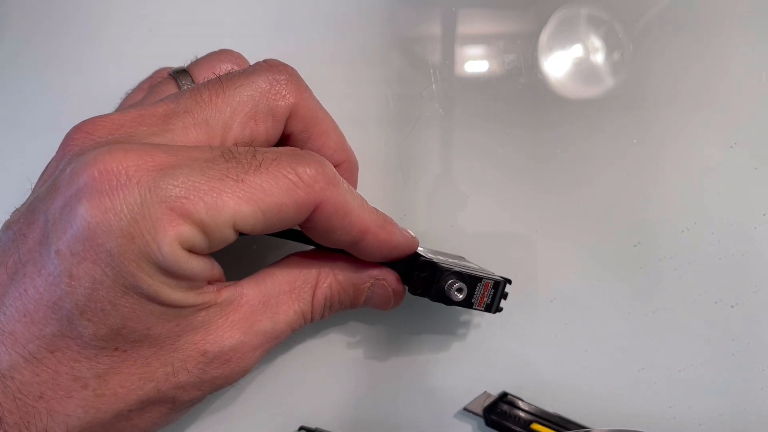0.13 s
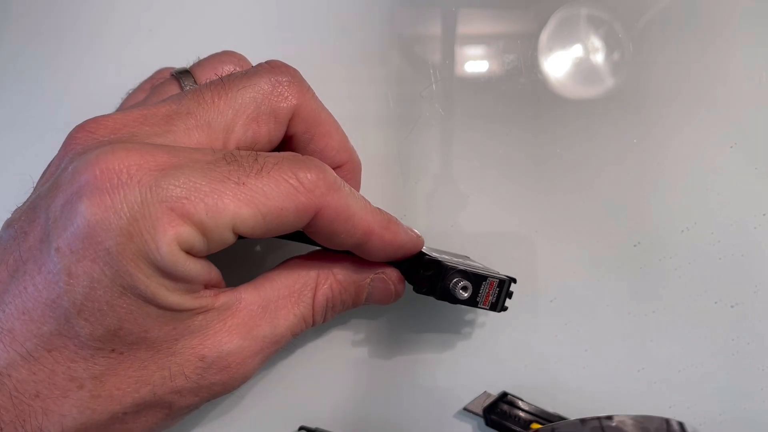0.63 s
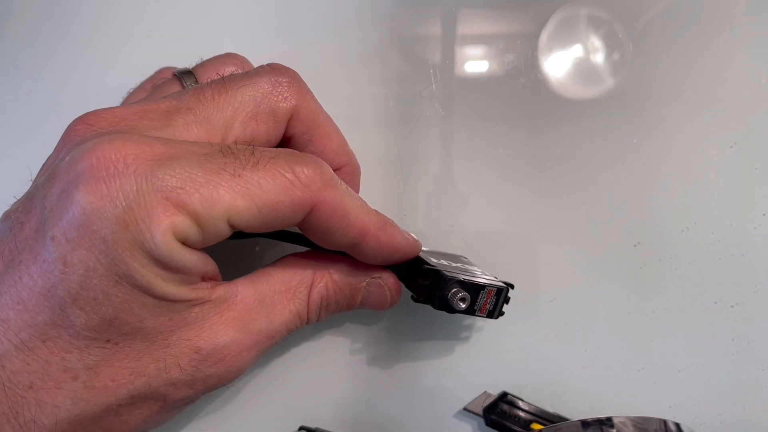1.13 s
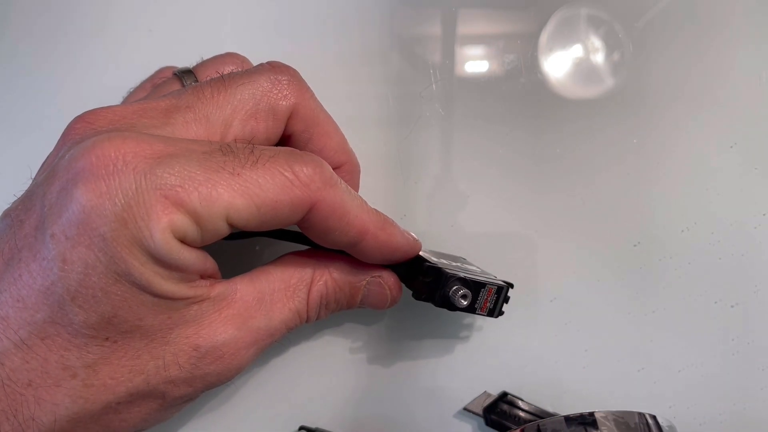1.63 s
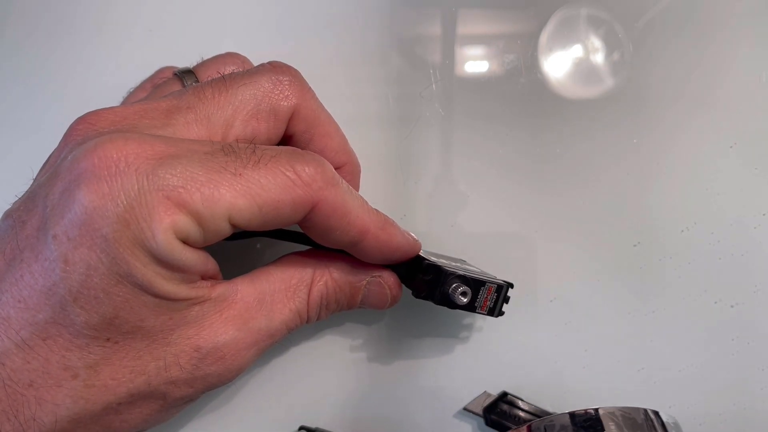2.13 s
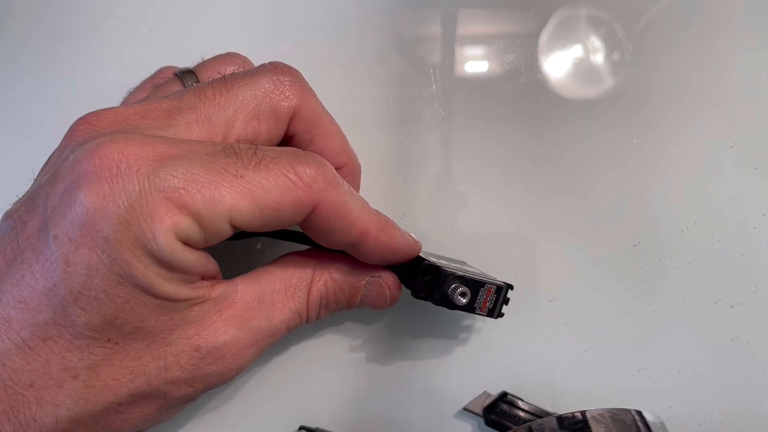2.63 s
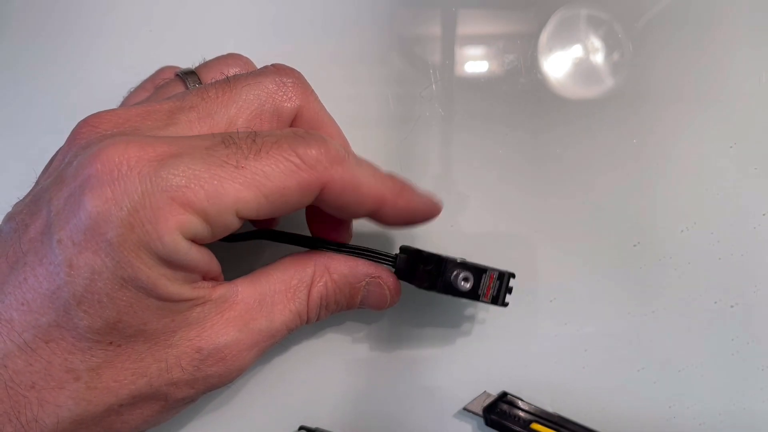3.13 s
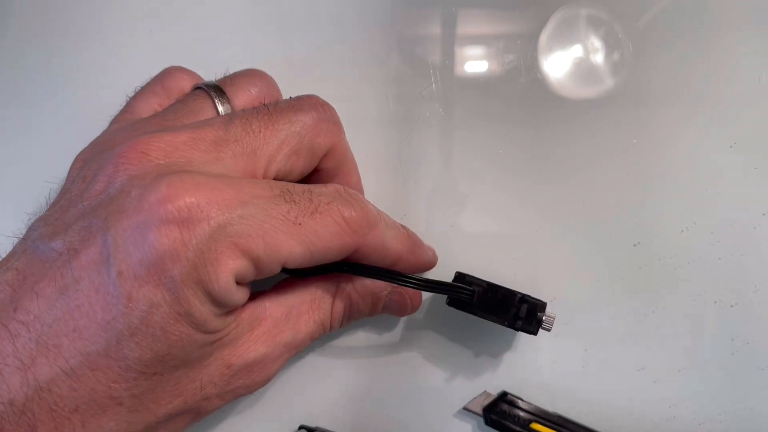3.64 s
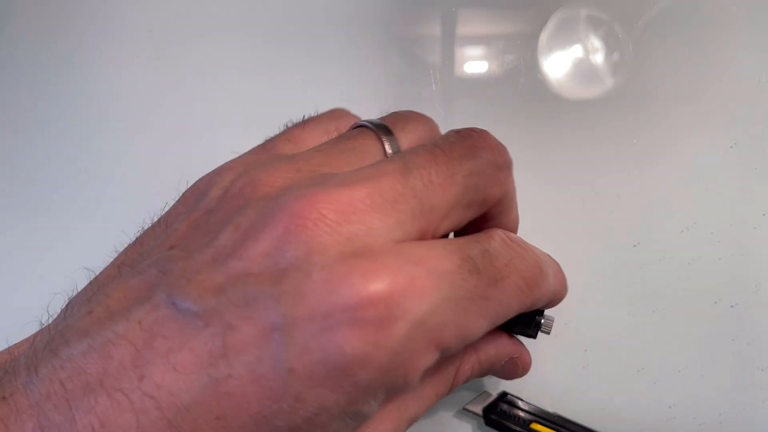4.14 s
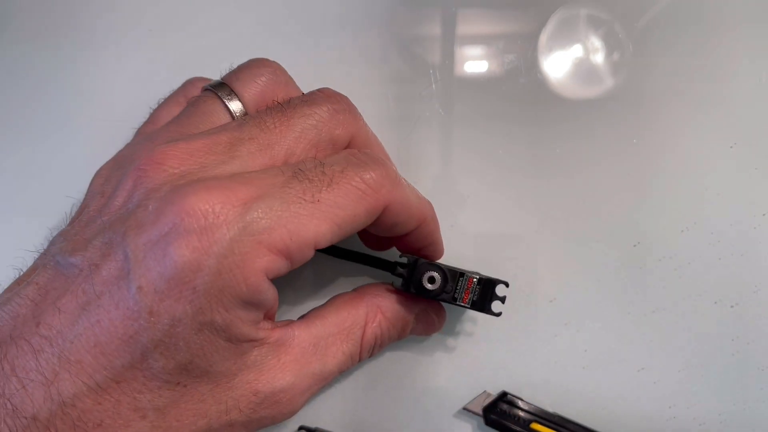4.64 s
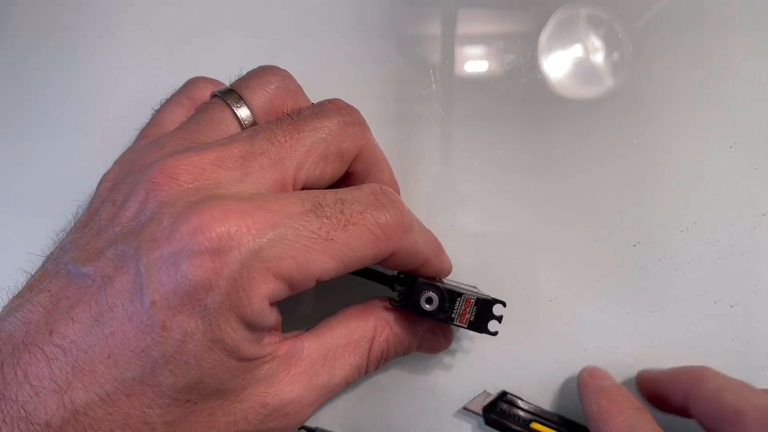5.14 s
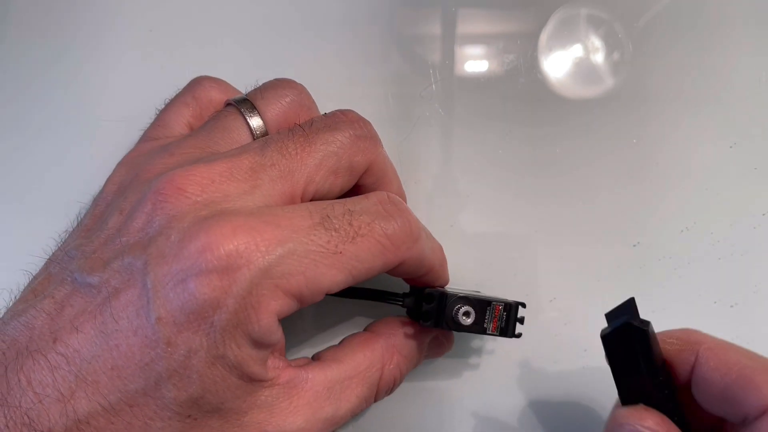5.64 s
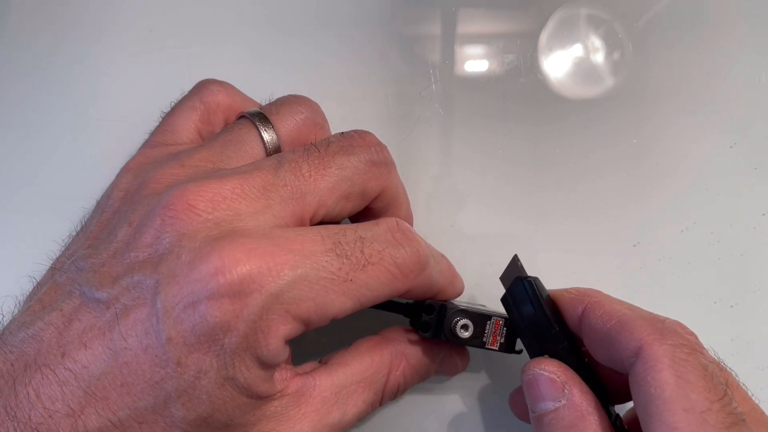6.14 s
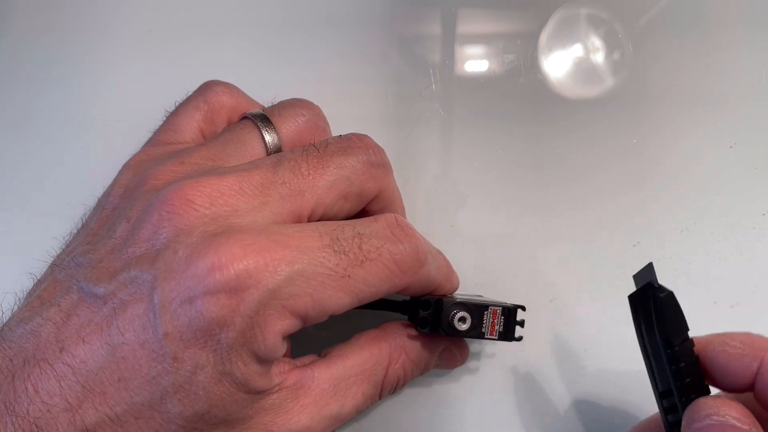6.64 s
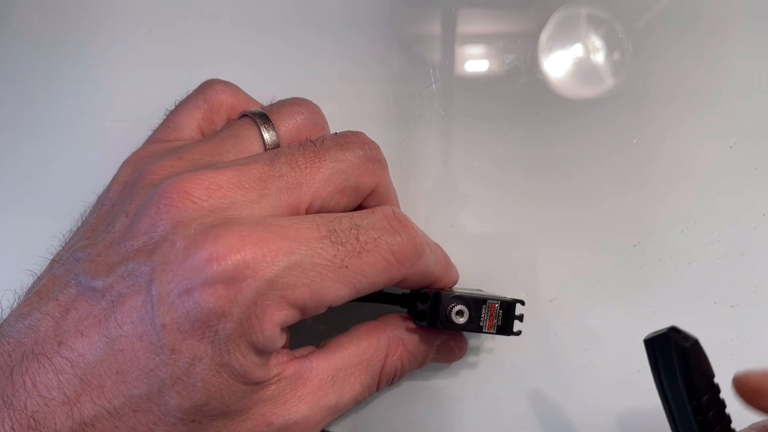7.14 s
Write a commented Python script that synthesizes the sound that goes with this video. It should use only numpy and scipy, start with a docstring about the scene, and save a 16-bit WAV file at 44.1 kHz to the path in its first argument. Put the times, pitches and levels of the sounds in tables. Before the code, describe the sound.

Loud steady hairdryer roar with a high motor whine, switched off into a falling glide, followed by bench thuds, light handling and sharp clicks.

```python
"""A hairdryer blows close by, then is switched off and coasts down with a falling whine and a fading rush of air.
It is laid on a glass-topped bench, and hands shift small parts and a plastic knife: knocks, clicks, thuds, rubbing.
The motor is a set of sines on multiples of the shaft speed; the air, casing buzz and rubbing are shaped noise.
Contacts and thuds are short pushes into damped modes; a noise tail gives the contacts their room.
Two close microphone ports pick it all up."""
import sys
import numpy as np
from scipy import signal
from scipy.fft import rfft, irfft, next_fast_len
from scipy.io import wavfile
from scipy.ndimage import uniform_filter1d

SR = 44100
rng = np.random.default_rng(int(sys.argv[2]) if len(sys.argv) > 2 else 0)


def wav_record(signal):
    """Record a signal, one row per channel, as 16-bit PCM in the file named by sys.argv[1]."""
    frames = np.transpose(np.atleast_2d(signal))
    bounded = np.clip(frames, -1, 1)
    # unit amplitude maps onto the largest positive 16-bit level
    quanta = np.round(bounded * 32767).astype(np.int16)
    wavfile.write(sys.argv[1], SR, quanta)


def undo_db(level):
    """Turn decibels back into plain size, where 20 dB means ten times bigger."""
    steps = np.asarray(level, float) / 20
    return 10 ** steps


N = 320607
SIZE = next_fast_len(N + SR)  # transform length, with room for the reverberant tail
HZ = np.maximum(np.arange(SIZE // 2 + 1) * SR / SIZE, 1)
SWITCH_S = 2.709  # the dryer is switched off

# Soft blows to the bench. Each row: start in seconds, peak level in dB, gain of the upper modes in dB,
# t60 of the lowest mode in seconds.
THUDS = [(3.367, -28.5, -2, 0.3), (3.409, -38, -9, 0.19), (3.559, -5, -1, 0.25), (3.648, -34.5, 15, 0.15),
         (3.996, -40, -21, 0.55), (4.193, -32.5, 0, 0.34), (4.218, -32.5, 3, 0.3), (4.323, -36.5, 15, 0.28),
         (4.388, -31, 6, 0.28), (5.124, -44, 5.5, 0.35), (6.291, -55, -3, 0.24), (7.26, -43, 14, 0.22)]


def rms_one(x):
    """Normalises the mean power: scales to rms 1."""
    return x / np.sqrt(np.mean(x ** 2) + 1e-30)


def in_time(rows):
    """Linear interpolation in time: every column of a table, read at every sample."""
    s, *columns = np.transpose(rows)
    return [np.interp(np.arange(N) / SR, s, column) for column in columns]


def at_hz(points, hz):
    """Linear interpolation in pitch: reads a (Hz, value) table on a log-frequency axis."""
    points_hz, values = np.transpose(points)
    return np.interp(np.log(hz), np.log(points_hz), values)


def bumps_db(peaks, hz):
    """Resonances in series: their gain curves, with steep skirts, add in dB."""
    return sum(db / (1 + (2 * (hz - top_hz) / width_hz) ** 2) ** 2 for top_hz, width_hz, db in peaks)


def drift(rate):
    """Band-limited random wander: normal draws, 2 * rate a second, joined by straight lines."""
    points = int(N / SR * rate * 2) + 2
    return np.interp(np.arange(N) / SR * rate * 2, np.arange(points), rng.standard_normal(points))


def ring(x, hz, t60):
    """Damped oscillator: a unit click sets a decaying sine of starting height 1 ringing."""
    radius = undo_db(-60 / (t60 * SR))
    angle = 2 * np.pi * hz / SR
    feedback = [1, -2 * radius * np.cos(angle), radius * radius]
    return signal.lfilter([0, np.sin(angle)], feedback, x + 1e-18)


def noise_bands(db_per_hz, edges_hz):
    """Partial coherence: coloured stereo noise, partly alike in both channels, cut into cross-fading bands."""
    # Each row: frequency in Hz, likeness of the two channels from 0 to 1.
    likeness = [(100, 1), (600, 0.92), (2000, 0.9), (4600, 0.8), (6000, 1), (7800, 0.8), (8400, 1),
                (9500, 1), (10000, 0.8), (12000, 0.6), (12600, 1)]
    mid, side = rfft(rng.standard_normal((2, SIZE)))
    alike = np.clip(at_hz(likeness, HZ), 0, 1)
    pair = undo_db(db_per_hz) * (np.sqrt(1 + alike) * mid + np.sqrt(1 - alike) * side * [[1], [-1]])
    below = [1 / (1 + (HZ / hz) ** 8) for hz in edges_hz]
    return [irfft(pair * (upper - lower), SIZE)[:, :N] for lower, upper in zip([0] + below, below + [1])]


def blade_rate():
    """Free deceleration: blade rate in Hz, gliding evenly in pitch between points, and its drop in halvings."""
    full_hz = 1524.2
    # The free rotor slows. Each row: time in seconds, blade rate in Hz.
    coasting = [(2.82, 1155), (2.94, 890), (3.06, 710), (3.18, 572), (3.29, 478), (3.4, 406), (3.6, 292),
                (3.72, 234), (3.83, 198), (4.1, 135), (4.6, 31)]
    s, hz = np.transpose([(SWITCH_S, full_hz)] + list(coasting))
    halvings = uniform_filter1d(np.interp(np.arange(N) / SR, s, np.log2(full_hz / hz)), size=600)
    return full_hz / 2 ** halvings, halvings


def motor(blade_hz, halvings, powered):
    """Harmonic radiation of a rotor: near sines on multiples of the shaft speed, beside a hum that stops at the switch."""
    blades = 6
    hum_hz, hum_db = 101.9, -47
    # The blade tone as the dryer is aimed. Each row: time in seconds, level in dB.
    blade_level = [(0, -23.5), (.7, -22.5), (1.4, -21.5), (2.7, -22)]
    # Motor tones. Each row: multiple of the shaft speed, level in dB relative to the blade tone,
    # loss in dB per halved speed, share of the casing gain, left over right in dB.
    tones = [(2, -21, 18.5, 0.06, -2.5), (3, -19.5, 15.5, 0.17, 5.5), (5, -18, 18, 0.8, 12.5),
             (6, 0, 18, 0.3, -1.5), (7, -23.5, 24.5, 0.7, -1), (10, -32, 6.5, 1.1, 7.5),
             (12, -15, 29.5, .3, 3), (17, -29.5, 20, .3, 3), (18, -25.5, 21, .3, 0.5),
             (20, -46, 1, 1.05, 6.5)]
    # The casing lights up tones that glide through. Each row: centre in Hz, width in Hz, gain in dB.
    casing = [(590, 110, 14.5), (680, 120, 29), (742, 85, 16), (799, 62, 21.5), (1220, 1700, 1.5)]
    blade_db, = in_time(blade_level)
    turns = np.cumsum(blade_hz * (1 + .0006 * drift(9))) / blades / SR
    hum = np.sqrt(2) * undo_db(hum_db) * powered * np.sin(2 * np.pi * hum_hz * np.arange(N) / SR)
    out = hum * np.ones((2, 1))
    stopping_db = -40 * np.maximum(halvings - 2.9, 0)
    for multiple, level_db, loss_db, share, pan_db in tones:
        casing_db = share * bumps_db(casing, multiple * blade_hz / blades)
        db = blade_db + level_db - loss_db * halvings + casing_db + stopping_db + 0.22 * drift(14)
        tone = np.sqrt(2) * undo_db(db) * np.sin(2 * np.pi * (multiple * turns + rng.random()))
        out = out + tone * undo_db(np.array([[.5], [-.5]]) * pan_db)
    return out


def air(halvings):
    """Turbulent flow: broadband noise whose treble dies fastest as the fan slows; each band flickers a little."""
    # The jet and the intake. Each row: frequency in Hz, level in dB per Hz ahead of the peaks.
    spectrum = [(30, -73.5), (60, -67), (160, -67.5), (250, -62), (400, -62), (750, -55.5), (1100, -62),
                (1650, -61.5), (2050, -68.5), (2700, -62), (3700, -69.5), (4900, -67), (7000, -68),
                (10800, -66), (13100, -66), (13900, -88)]
    # Resonances of the flow. Each row: centre in Hz, width in Hz, gain in dB.
    peaks = [(541, 130, 4.5), (691, 22, 5), (856, 210, 1.5), (2500, 130, 3), (2810, 58, 5),
             (3637, 430, 9.5)]
    # Each row: frequency in Hz, loss in dB per halved speed.
    slowing_loss = [(60, 6.5), (300, 13), (1000, 13.5), (3000, 16.5), (10000, 24)]
    # Each row: frequency in Hz, left over right in dB.
    balance = [(300, -0.3), (700, 3), (1200, 7), (1600, 0.5), (2900, 1), (4000, -0.3)]
    edges = np.geomspace(90, 9000, 9)
    centres = np.append(edges / 1.1, edges[-1] * 1.33)
    pan = undo_db(np.array([[.5], [-.5]]) * at_hz(balance, HZ))
    per_hz_to_gain_db = 10 * np.log10(SR / 4)
    bands = noise_bands(at_hz(spectrum, HZ) + bumps_db(peaks, HZ) + per_hz_to_gain_db, list(edges))
    out = 0
    for band, hz in zip(bands, centres):
        out = out + band * undo_db(0.79 * drift(12) - at_hz(slowing_loss, hz) * halvings)
    return irfft(rfft(out, SIZE) * pan, SIZE)[:, :N]


def casing_buzz(halvings, powered):
    """Resonance under random drive: the slowing rotor keeps the casing humming, as noise through one narrow mode."""
    # Resonance in Hz, its t60 in seconds, level in dB at full speed.
    hz, t60, level_db = (690, .25, -47.5)
    db = level_db - 3 * halvings - 40 * np.maximum(halvings - 3.3, 0)
    return (1 - powered) * undo_db(db) * rms_one(ring(rng.standard_normal(N), hz, t60))


def contacts():
    """Impact excitation: short pushes, firm for the knock and gritty for the treble, drive four groups of damped modes."""
    # Contacts on the bench. Each row: start in seconds, level in dB, hardness as treble over knock in dB,
    # extra clack in dB.
    contact_rows = [(2.708, -25, 0.5, 3.5), (3.364, -48.5, -1.5, 5.5), (3.532, -20.5, -25, 5),
                    (3.553, -16, 4.5, -0.5), (3.598, -21.5, -9, 0), (3.683, -42.5, -5, -2),
                    (3.842, -38, 3, -3.5), (3.974, -55.5, 4, 4.5), (4.073, -44, -17, -2),
                    (4.085, -46, -15, 4), (4.123, -53, 8, 7), (4.176, -40, -30, -8), (4.195, -31.5, -32, 7),
                    (4.322, -16.5, -12, 7), (4.463, -28, -36, 10), (4.585, -41, 3.5, -13),
                    (4.652, -51, -36, 3), (4.665, -52, -31, -3), (4.739, -55, -41, -3.5),
                    (4.865, -40.5, -46, 11), (5.12, -60.5, -17.5, 3.5), (5.18, -48.5, -18.5, -1),
                    (5.194, -62.5, -1, -9), (5.251, -50.5, -6.5, 14), (5.274, -48, -18, 12.5),
                    (5.298, -59, -15, 10), (5.355, -60, -4, 2), (5.425, -52.5, -2.5, -7),
                    (5.53, -62, -22.5, -4.5), (5.606, -75.5, 2, 9), (5.9, -49.5, -41, -8),
                    (5.933, -62, -35, 0), (5.964, -45.5, -45.5, -3), (5.975, -53, -38, 6),
                    (6.004, -43.5, -52, -7), (6.027, -38.5, -45, 3), (6.095, -64.5, -32, 0),
                    (6.352, -61.5, -5.5, -12), (6.475, -53.5, -34.5, -12), (6.593, -63.5, 21, 9),
                    (6.766, -28.5, 42, -0.5), (6.873, -67, 17, 8), (7.065, -60.5, 20, -5.5),
                    (7.178, -47, 32, -9), (7.191, -17, 33.5, -9.5), (7.245, -61, 22, 9),
                    (7.26, -18.5, 47, -2), (7.265, -14, 41, -10)]
    # Four groups: knock, clack, tick, snap. Each row in a group: mode in Hz, relative level in dB, t60 in seconds.
    mode_groups = [
        [(625, 0, .021), (683, 3.5, 0.011), (825, -3, .022), (960, -5.5, 0.01), (1320, -4.5, 0.0077),
         (1530, -9, 0.0087)],
        [(2180, 2.8, 0.0048), (2820, 7, 0.0024), (3340, -3.5, 0.0063), (4300, -3, 0.0027)],
        [(5310, 2.5, 0.0024), (6330, 3.5, 0.0029), (7800, 1.5, 0.0035)],
        [(9500, -5, 0.0027), (10810, 5.5, 0.0029), (12000, 4.4, 0.0049), (14800, 10, 0.00083)],
    ]
    clack_share = .65  # share of the hardness that reaches the clack
    mode_spread_db = 3.5  # chance in each mode's strength
    soft_dulling = 0.16  # dB per octave lost within a group for each dB of softness
    s, peak_db, hard_db, clack_db = np.transpose(contact_rows)
    knock_db = peak_db - np.maximum(hard_db, 0)
    treble_db = peak_db + np.minimum(hard_db, 0)
    levels = [knock_db, knock_db + clack_share * hard_db + clack_db, treble_db, treble_db]
    soft_db = soft_dulling * np.minimum(hard_db, 0)[:, None]
    push_s = [0.0012, 0.0014, 0.0007, 0.001]
    firmness = [0.58, 0.26, .01, .01]
    lifts_db = [6.75, 6.4, 4.1, 12]
    out, t = np.zeros(N), np.arange(900) / SR
    for modes, level_db, lasts_s, firm, lift_db in zip(mode_groups, levels, push_s, firmness, lifts_db):
        lowest_hz, highest_hz = modes[0][0], modes[-1][0]
        grit = rng.standard_normal((len(s), len(t))) * (t / lasts_s) ** 2 * np.exp(-t / lasts_s)
        push = np.pad(grit + firm * np.exp(-t / 0.0001) * 3, ((0, 0), (0, 2500)))
        chance_db = mode_spread_db * rng.standard_normal((len(s), len(modes)))
        rung = 0
        for k, (hz, db, t60) in enumerate(modes):
            mode_db = db + chance_db[:, [k]] + soft_db * np.log2(hz / lowest_hz)
            rung = rung + undo_db(mode_db) * ring(push, hz, t60)
        span = signal.butter(3, [0.72 * lowest_hz, 1.4 * highest_hz], "band", fs=SR, output="sos")
        rung = signal.sosfilt(span, rung)
        loudest_power = uniform_filter1d(rung ** 2, size=130).max(axis=1)
        sizes = undo_db(level_db + lift_db) / np.sqrt(loudest_power * 4)
        for at, one in zip(np.round(s * SR).astype(int), rung * sizes[:, None]):
            out[at:at + len(one)] += one[:N - at]
    return out


def thuds():
    """Modal response to a soft push of 2 ms: the bench's lower modes start later and last longer."""
    # Modes of the whole bench. Each row: frequency in Hz, relative level in dB.
    bench_modes = [(70, -2.5), (105, -4.5), (135, -1.5), (195, -8.5), (290, -7.5), (378, -10), (480, -13.5)]
    out, push = np.zeros(N), np.hanning(90)
    for s, peak_db, upper_db, t60 in THUDS:
        rung = 0
        for k, (hz, db) in enumerate(bench_modes):
            late = int(0.33 / hz * SR)  # a third of a period
            late_push = np.pad(push, (late, SR // 2 - late))
            mode_t60 = t60 * (bench_modes[0][0] / hz) ** .5
            rung = rung + undo_db(db + upper_db * (k > 0)) * ring(late_push, hz, mode_t60)
        at = round(s * SR)
        out[at:at + len(rung)] += (undo_db(peak_db) * rung / abs(rung).max())[:N - at]
    return signal.sosfilt(signal.butter(2, 52, "high", fs=SR, output="sos"), out)


def rubbing():
    """Friction noise: grainy strokes of skin and plastic, each with its own colour, and rattle over the room's rumble."""
    # Hands at work. Each row: time in seconds, level of the hiss in dB, level of the low rustle in dB.
    handling = [(3.1, -62, -47), (3.2, -70, -68), (3.45, -61, -45), (3.8, -68, -55.5), (4.02, -58, -57.5),
                (4.3, -61.5, -66), (4.4, -73, -69), (4.6, -92, -71.5), (4.91, -93, -96.5),
                (5.18, -90.5, -86), (5.31, -78.5, -65), (5.36, -75, -83), (5.68, -87, -90),
                (5.99, -91, -73), (6.2, -82.5, -79), (6.37, -68.5, -87), (6.55, -89, -96),
                (7.13, -83.5, -89.5), (7.27, -77, -72.5)]
    # Rubbing strokes. Each row: start in seconds, end in seconds, level in dB above 6.3 kHz,
    # level in dB from 1.8 to 6.3 kHz, strongest frequency in Hz.
    stroke_rows = [(3.357, 3.56, -58, -72, 4540), (5.12, 5.199, -80, -90, 8600),
                   (5.233, 5.44, -85, -85, 9950), (5.422, 5.468, -64, -68, 6950),
                   (5.532, 5.562, -89, -91, 9500), (5.596, 5.675, -84, -85, 4180),
                   (5.725, 5.761, -75, -80, 6530), (5.835, 5.867, -87, -83, 6450),
                   (5.983, 6.034, -89.5, -100, 10250), (6.159, 6.214, -71, -76, 4370),
                   (6.257, 6.34, -69, -76.5, 4390), (6.362, 6.42, -63, -66, 5480),
                   (6.543, 6.607, -81, -82, 4300), (6.722, 6.767, -71, -69.5, 9970),
                   (6.895, 6.918, -76.5, -72.5, 9730), (6.936, 6.969, -77.5, -81.5, 5700),
                   (7.067, 7.087, -64, -66.5, 5260), (7.154, 7.155, -67, -74.5, 9450),
                   (7.222, 7.258, -61, -76, 7000)]
    # Colour of the friction noise. Each row: frequency in Hz, relative level in dB per Hz.
    spectrum = [(30, -4), (70, 5), (150, -3), (330, -8.5), (700, -11.5), (1400, -16.5), (2300, -8.5),
                (3300, -2), (4300, -3.5), (5200, -2.5), (6500, -5), (8500, 2.5), (11000, -3), (13000, -5),
                (16000, -32.5)]
    # Its resonances. Each row: centre in Hz, width in Hz, gain in dB.
    peaks = [(2230, 350, 3.5), (4300, 300, 9.5), (5800, 1200, 3), (10700, 2700, 7)]
    # The low rumble swells once: centre in seconds, half width in seconds, gain in dB.
    swell_s, swell_half_s, swell_top_db = (6.1, 0.27, 6.4)
    rattle_db, rattle_rise_s, rattle_t60_s = -14, 0.0074, .22  # loose things shake after each thud
    deep_db, rumble_db, mid_floor_db = -76, -75, -94.5  # the quiet room
    hiss_in_mid_db, rustle_in_mid_db, rustle_in_rumble_db = -15.5, -15, -1
    t = np.arange(N) / SR
    hiss, rustle = undo_db(in_time(handling))
    for s, peak_db, _, _ in THUDS:
        after = np.maximum(t - s, 0)
        decay = undo_db(peak_db + rattle_db - 60 * after / rattle_t60_s)
        rustle = rustle + decay * (1 - np.exp(-after / rattle_rise_s))
    edges = [400, 1800, 2700, 3700, 5000, 6300, 7800, 9300, 11000]
    deep, rumble, low, *bands = noise_bands(at_hz(spectrum, HZ) + bumps_db(peaks, HZ), [60] + edges)
    centres = np.sqrt(np.multiply(edges[1:], edges[2:] + [13000]))
    mid = undo_db(mid_floor_db) + hiss * undo_db(hiss_in_mid_db) + rustle * undo_db(rustle_in_mid_db)
    gains = np.array([mid] * 4 + [hiss] * 4)
    for start, end, stroke_high_db, stroke_mid_db, strongest_hz in stroke_rows:
        progress = np.clip((t - start + .008) / (end - start + 0.026), 0, 1)
        stroke = np.sin(np.pi * progress ** 0.7) ** 1.3
        colour_db = 11 * np.exp(-(np.log(centres / strongest_hz) / 0.14) ** 2)
        stroke_db = np.repeat([stroke_mid_db, stroke_high_db], 4) + colour_db
        gains += np.outer(undo_db(stroke_db), stroke)
    sizes = np.repeat([np.std(sum(bands[:4])), np.std(sum(bands[4:]))], 4)
    rub = sum(band / size * gain * undo_db(5.8 * drift(4.6)) for band, size, gain in zip(bands, sizes, gains))
    swell_db = swell_top_db * np.exp(-((t - swell_s) / swell_half_s) ** 2)
    rumble_gain = undo_db(rumble_db + swell_db) + rustle * undo_db(rustle_in_rumble_db)
    grain = undo_db(3 * drift(70))
    return rms_one(deep) * undo_db(deep_db) + rms_one(rumble) * rumble_gain + rms_one(low) * rustle + rub * grain


def room(x):
    """Diffuse reverberation: convolution with a noise tail that starts at the first wall and dies band by band."""
    # One row per band. Each row: nominal frequency in Hz (not used), t60 in seconds, level in dB.
    decays = [(250, 0.11, -12.5), (1500, 0.18, -9.5), (5000, 0.16, -9), (9000, 0.15, -13.5)]
    first_wall_s = 0.0048
    t = np.arange(N) / SR - first_wall_s
    tail = 0
    for band, (_, t60, db) in zip(noise_bands(0 * HZ, [600, 3000, 7000]), decays):
        energy_db = 10 * np.log10(t60 * SR / 14)  # evens out the energy of long and short tails
        tail = tail + undo_db(db - 60 * t / t60 - energy_db) * band
    tail = (tail * np.clip(t / 0.0027, 0, 1))[:, :SR // 2]
    return irfft(rfft(x, SIZE) * rfft(tail, SIZE), SIZE)[:, :N]


def scene():
    """Superposition: dryer, contacts with their reverberation, thuds and rubbing add."""
    blade_hz, halvings = blade_rate()
    powered = np.clip((SWITCH_S + 0.012 - np.arange(N) / SR) / 0.02, 0, 1)
    hits = contacts()
    dryer = motor(blade_hz, halvings, powered) + air(halvings) + casing_buzz(halvings, powered)
    return dryer + hits + room(hits) + thuds() + rubbing()


def low_pass(x):
    """Removes everything above the highest recorded frequency."""
    return signal.sosfilt(signal.butter(12, 16260, fs=SR, output="sos"), x)


def record(dry):
    """Linear filtering: two ports share one response, with a phase difference that grows with frequency."""
    # Response of both ports. Each row: frequency in Hz, gain in dB.
    microphone = [(20, -25.5), (45, -7), (70, -1.02), (11300, -1.04), (12400, -9.5), (13300, -26.5),
                  (16000, -26)]
    # Each row: frequency in Hz, lead of the left port in radians.
    port_phase = [(0, 0), (1900, .2), (2800, 1), (3500, .7), (4300, 1.1), (4650, 2), (5250, 5.3), (5600, 6),
                  (9000, 9.42), (12400, 12.5), (16000, 15.8)]
    lead = np.interp(HZ, *np.transpose(port_phase))
    ports = undo_db(at_hz(microphone, HZ)) * np.exp(.5j * lead * [[1], [-1]])
    mix = irfft(rfft(dry, SIZE) * ports, SIZE)[:, :N]
    return low_pass(mix)


dry = scene()
out = record(dry)
wav_record(out)
```